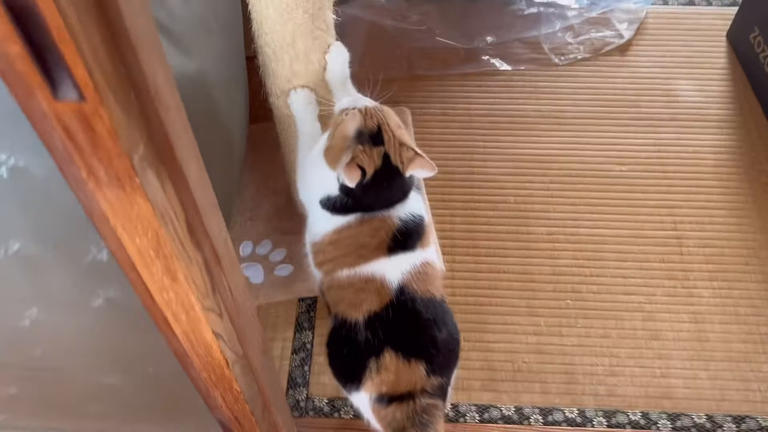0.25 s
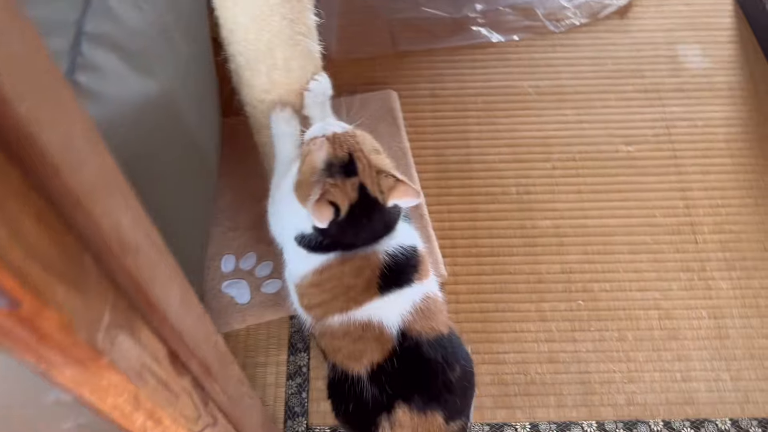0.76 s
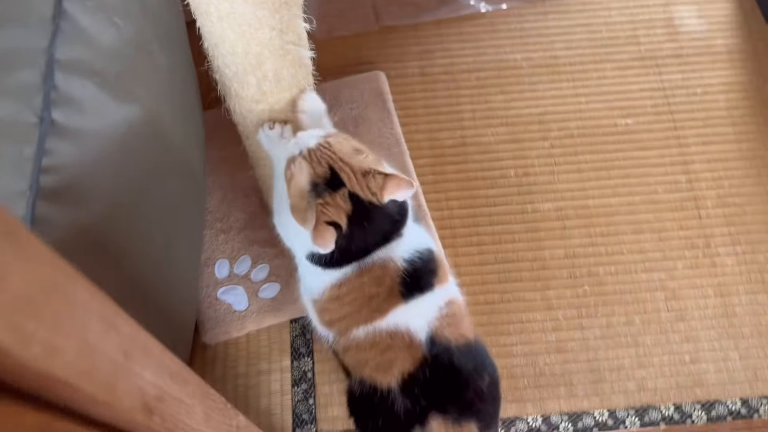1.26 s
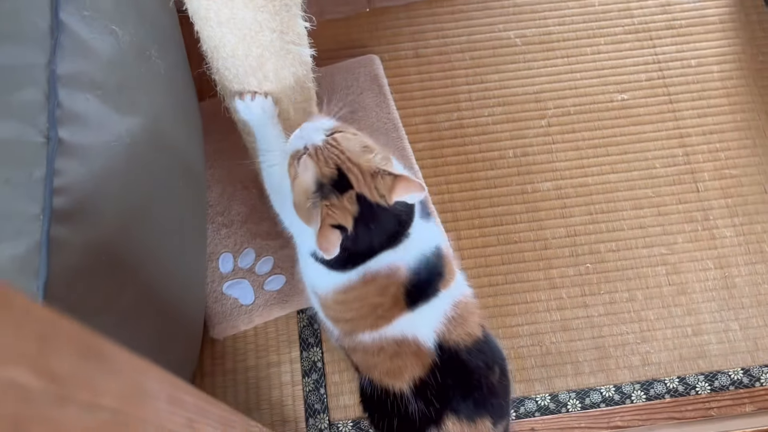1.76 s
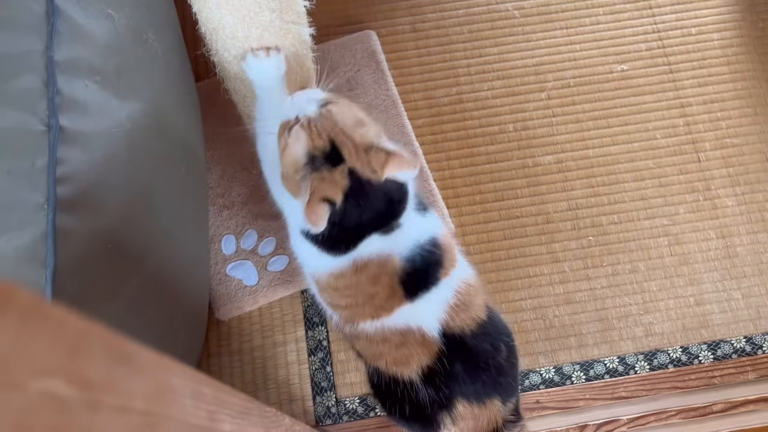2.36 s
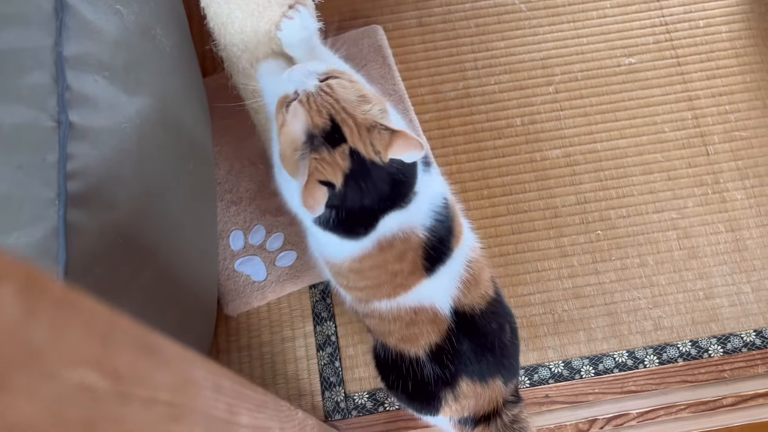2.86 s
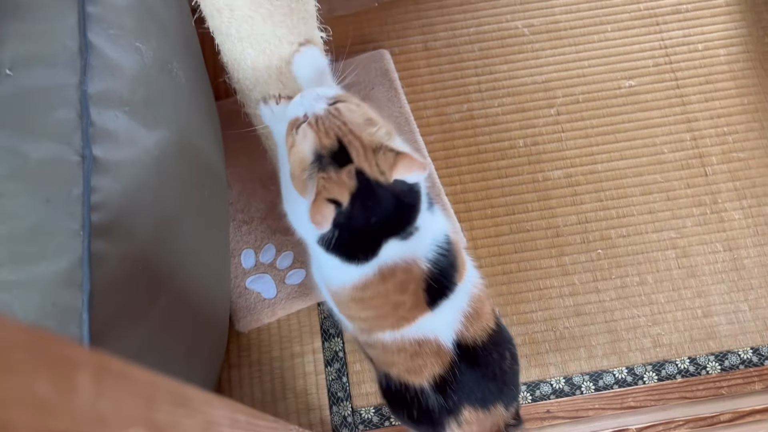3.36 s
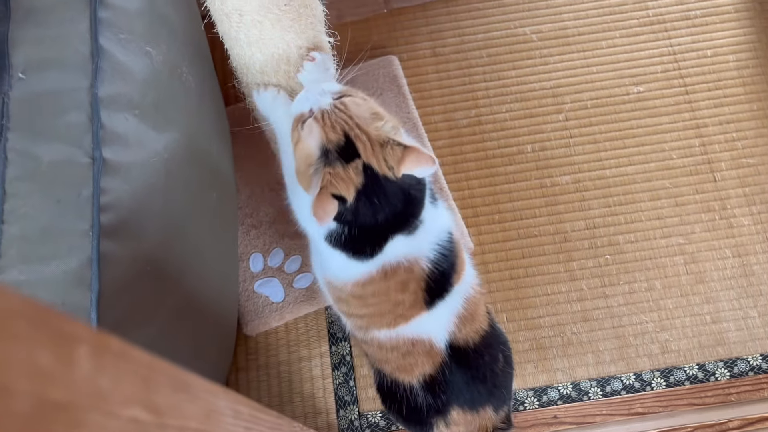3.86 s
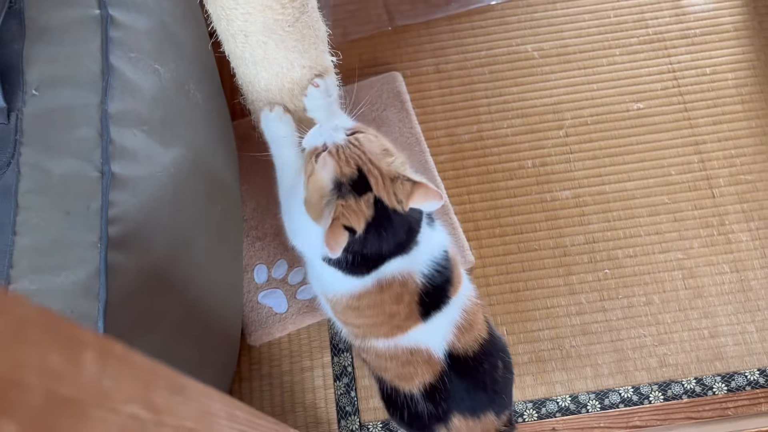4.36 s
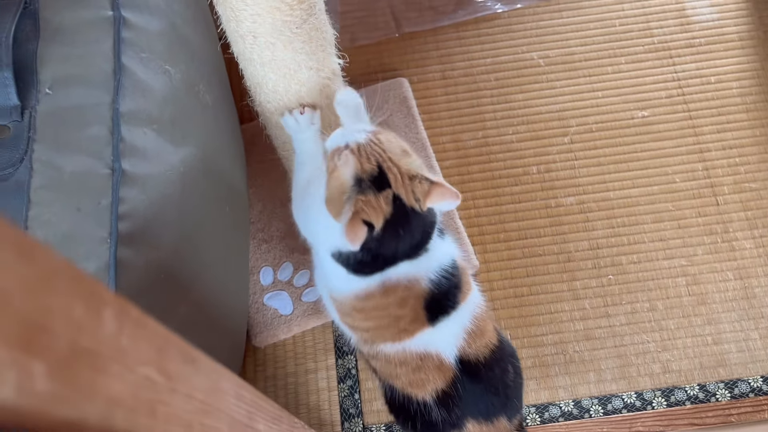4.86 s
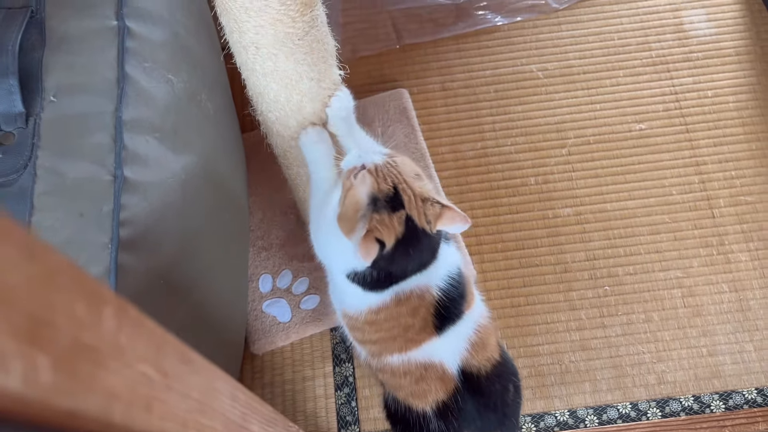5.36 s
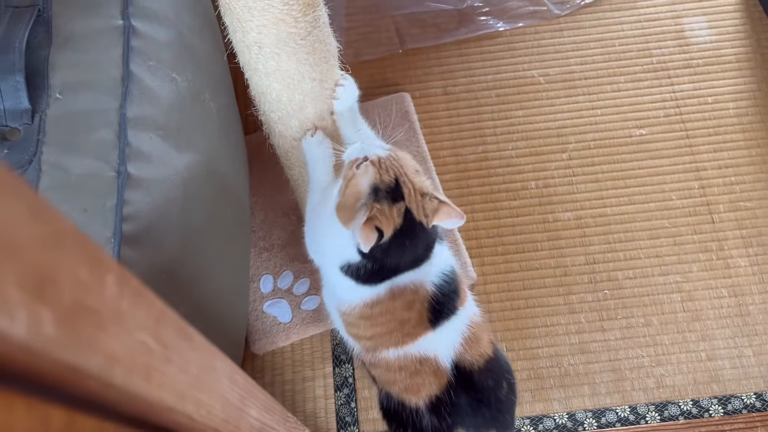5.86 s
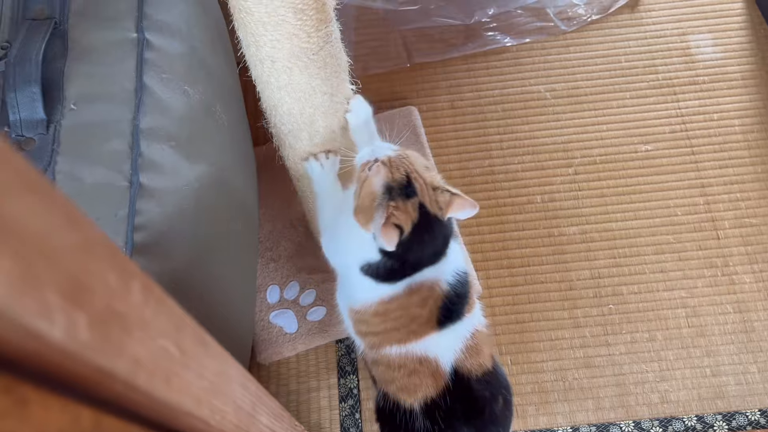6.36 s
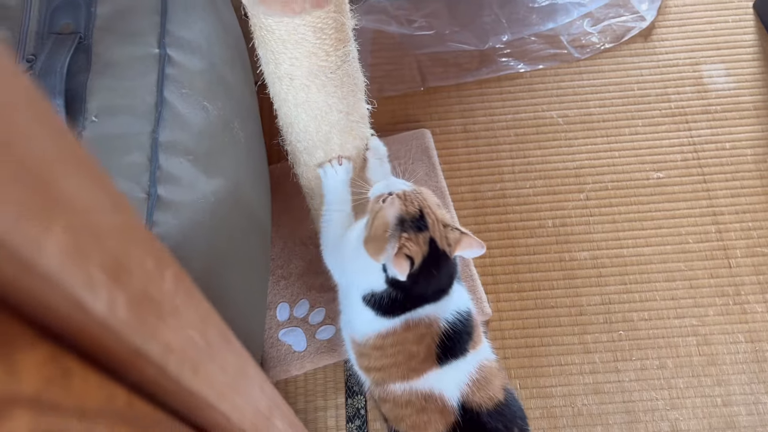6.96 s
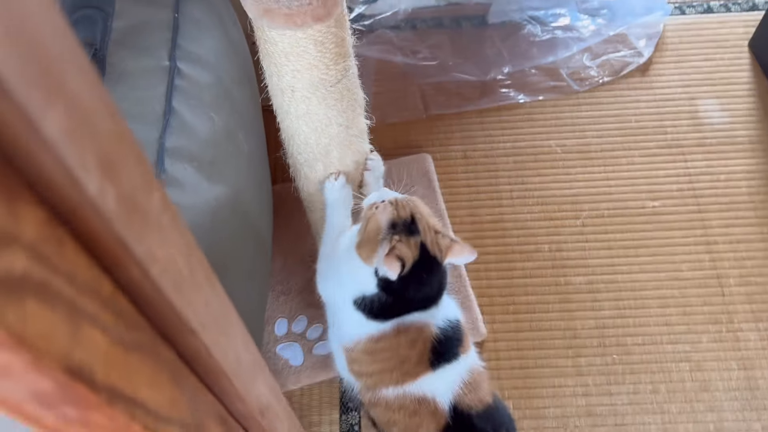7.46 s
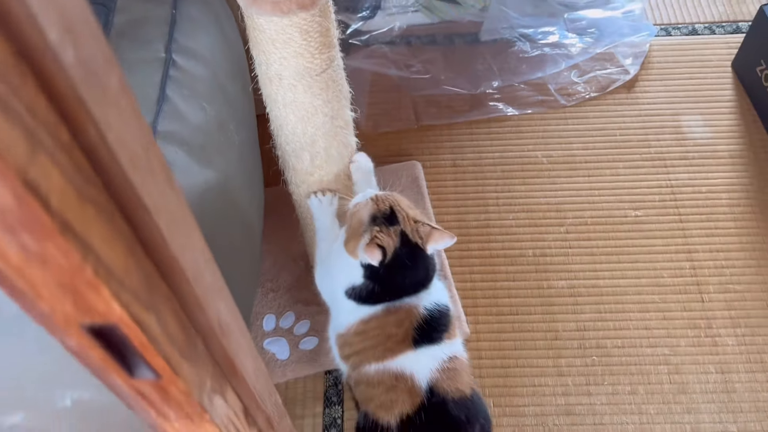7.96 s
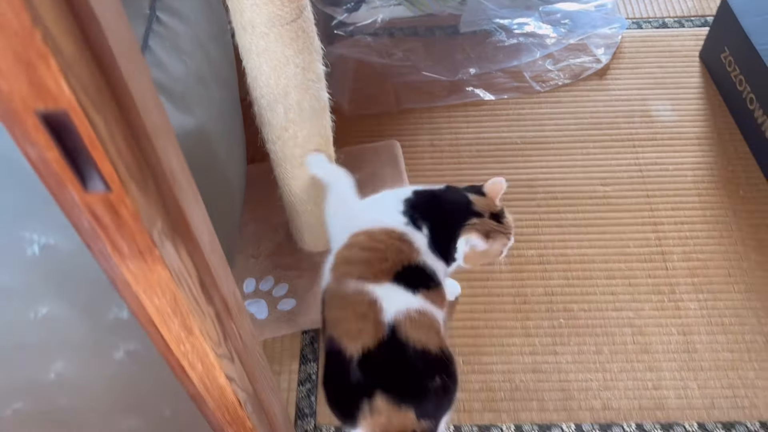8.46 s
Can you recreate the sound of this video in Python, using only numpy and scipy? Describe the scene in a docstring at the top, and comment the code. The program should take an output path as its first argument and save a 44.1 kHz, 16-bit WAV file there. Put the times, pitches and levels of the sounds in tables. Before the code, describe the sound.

Sharp claw snaps on sisal-like rope, dry and hollow, come unevenly with brief rips, tiny squawky woody chirps and soft paw rubs. The strongest flurry comes late, with dull low thumps of the base board and a small creak, then sparser snaps and a last gentle weight shift. Heard close on a hand-held device in a small room with short echoes, light hiss and wavering low rumble.

```python
"""Cat claws tear at a rope-wrapped scratching post: they catch, rip through fibres and snap free.
Each release is a sharp click with a trail of tiny slips, and it rings the modes of the hollow post.
Paws brush and slide on the rope as random small slips; the base board thumps and creaks below.
A small room answers with random, fading echoes, over faint hiss and a wavering low rumble.
Two microphone ports on a hand-held phone each hear the post with their own level and delay."""
import sys
import numpy as np
from scipy import signal
from scipy.fft import rfft, irfft, next_fast_len
from scipy.io import wavfile
from scipy.ndimage import uniform_filter1d

SR = 44100
rng = np.random.default_rng(int(sys.argv[2]) if len(sys.argv) > 2 else 0)


def put_to_file(sound):
    """Save the sound as 16-bit audio at rate SR, in the file named by the first command-line argument."""
    columns = np.atleast_2d(sound).T  # one column per channel
    safe = np.clip(columns, -1, 1)
    whole_steps = np.round(safe * 32767)
    wavfile.write(sys.argv[1], SR, whole_steps.astype(np.int16))


N = 383209  # length of the scene in samples

# Event levels are those at the source, before spectrum filters, ports, room and microphone.
# a claw snaps free: start_s, tube_ring_db, ring_centre_hz, fibre_crack_db, tip_tick_db, post_knock_db
SNAPS = [(0.0459, -49, 1550, -51.5, -61, -52.5), (0.4236, -46.5, 1470, -46.5, -48.5, -51),
         (0.749, -49.5, 1420, -54, -48.5, -54), (0.8945, -51, 1180, -48, -40, -57.5),
         (1.3323, -49, 1100, -62.5, -69, -51.5), (1.724, -41, 1460, -43.5, -39.5, -48.5),
         (1.8514, -42.5, 1530, -47, -48, -49), (2.272, -52.5, 980, -60, -64, -53),
         (2.7369, -52.5, 1010, -57.5, -52.5, -49.5), (2.9775, -47, 1230, -47, -38.5, -53.5),
         (3.158, -43.5, 890, -45, -38, -47.5), (3.9913, -47.5, 800, -54, -46.5, -46.5),
         (4.3671, -48, 1190, -51, -64, -53.5), (4.7084, -41, 874, -40.5, -37.5, -45.5),
         (5.1433, -49.5, 1090, -47, -44.5, -50), (5.4327, -49.5, 1160, -62, -35.5, -50),
         (5.9786, -51.5, 1580, -46.5, -53, -51), (6.413, -49, 1250, -47, -46, -45),
         (6.426, -45, 1300, -38, -42, -42.5), (7.076, -47, 1180, -43, -55, -46),
         (7.5714, -49.5, 1570, -45, -46, -49.5), (7.983, -49.5, 1380, -55, -45, -49)]
# a claw tip snags in the rope: start_s, tube_thud_db, tip_scratch_db
CATCHES = [(0.163, -61, -67.5), (0.686, -60.5, -66.5), (0.824, -77, -63), (2.001, -66, -55.5),
           (2.09, -56, -67), (2.102, -62, -64), (2.636, -59.5, -67), (3.154, -43.5, -47.5),
           (3.271, -53, -53.5), (3.286, -45, -58), (3.708, -62.5, -59.5), (4.802, -68, -58.5),
           (5.787, -57, -61), (6.073, -51.5, -55.5), (6.242, -58.5, -59), (6.536, -54, -50.5),
           (6.551, -53, -55.5), (6.627, -54.5, -49), (6.636, -46, -57), (6.974, -62.5, -61.5),
           (7.051, -55, -64)]
# claws drag through the fibres; each part is set against the level: start_s, length_s, level_db, ring_centre_hz
RIPS = [(0.904, 0.087, -48, 1170), (1.333, 0.025, -52.5, 955), (1.864, 0.056, -45.5, 1210),
        (2.274, 0.048, -48, 970), (3.284, 0.045, -48, 1260), (5.876, 0.02, -52.5, 1400),
        (6.507, 0.096, -53, 1400)]
# a dragging claw makes the tube squawk, level before its wavering: start_s, length_s, level_db, pitch_hz
SQUAWKS = [(0.943, 0.015, -45, 945), (0.96, 0.017, -54, 1124), (1.901, 0.021, -48.5, 920),
           (2.271, 0.056, -47.5, 968.4), (3.292, 0.013, -46, 1290)]
# a paw brushes along the rope, level before it turns patchy: start_s, length_s, level_db
BRUSHES = [(1.265, 0.19, -71), (1.624, 0.034, -62.5), (2.617, 0.083, -70.5), (3.093, 0.042, -63.5),
           (3.86, 0.11, -71.5), (4.918, 0.11, -69), (5.687, 0.05, -65.5), (6.244, 0.15, -67.5),
           (7.264, 0.097, -70), (8.372, 0.11, -66.5)]
# a pad slides without claws, level before it turns patchy: start_s, length_s, level_db
SLIDES = [(0.469, 0.12, -68), (2.359, 0.5, -73.5), (2.876, 0.079, -61), (7.631, 0.124, -71)]
# the cat shifts its weight onto the base board, pitch before it varies: start_s, level_db, pitch_hz
THUMPS = [(0.19, -59.5, 60), (0.523, -52, 50), (0.921, -48.5, 92), (3.318, -54.5, 96), (5.408, -49, 92.8),
          (6.097, -55.5, 93), (6.438, -41, 62.4), (6.517, -34, 97), (6.567, -41.5, 92), (6.638, -46, 89.2),
          (7.16, -49.5, 60.3), (7.329, -52, 88), (8.564, -51, 88.2)]
# the loaded base creaks: start_s, level_db, pitch_hz
CREAKS = [(6.535, -51, 370), (6.62, -56.5, 570), (7.489, -62, 444)]

# modes of the rope-wrapped tube, before each strike varies them: pitch_hz, level_db, t60_s (time to fall 60 dB)
POST_MODES = [(476, -1.5, 0.039), (535, -1, 0.034), (881, 0.5, 0.025), (1029, -0.5, 0.017),
              (1259, -0.5, 0.021), (1609, 2, 0.022), (1910, -0.5, 0.014), (2335, -1.5, 0.011)]
# low modes of post and base: pitch_hz, level_db, t60_s
KNOCK_MODES = [(146, -2.5, 0.052), (190.3, 11, 0.035), (402.4, 1.5, 0.027)]
# lingering modes of the furniture and the room: pitch_hz, level_db, t60_s
ROOM_MODES = [(223, 0.5, 0.17), (313.2, -1.5, 0.69), (360.6, -5, 0.67)]

# spectrum shapes, overall level set elsewhere: frequency_hz, level_db
CRACK = [(350, -15.5), (1900, 1), (2600, -5.5), (3600, 0.5), (5200, -5.5), (8500, -14.5), (14000, -35)]  # a fibre cracking
TICK = [(1500, -18), (7000, -12.5), (12500, -11), (16500, -34)]  # a claw tip ticking
FIBRE = [(300, 3), (1000, 12), (3500, 5.5), (6500, -1), (13000, -3), (16000, -34.5)]  # fibres crackling
CLAW = [(2200, -7), (3500, -1), (5000, -9.5), (13000, -11), (16000, -34)]  # a claw tip scratching
FUR = [(400, -3.5), (1500, 3), (3600, 0.5), (6000, -4), (13200, -1), (16000, -34.5)]  # loose hairs of the rope
PAD = [(300, -0.5), (750, 1), (2200, -2.5), (7000, -26)]  # a pad on the rope
RATTLE = [(90, -13), (200, 1.5), (320, -7), (470, -1.5), (800, -5), (1600, -38)]  # the post in its seat
SCUFF = [(60, 11), (400, -7), (900, -27), (3000, -46)]  # the board on the mat
ROOM_COLOUR = [(50, 4), (250, 3), (3000, -2.5), (13000, -8.5)]  # the echoes
AIR = [(25, -15), (76, 2.5), (641, -11.5), (3430, -31), (8140, -50), (10200, -42), (12500, -36.5),
       (14000, -31), (16000, -47)]  # still air
RUMBLE = [(20, -19.5), (45, 2), (95, 4), (130, -11.5), (330, -13), (2000, -62.5)]  # low rumble
# response of the microphone: frequency_hz, gain_db
MICROPHONE = [(20, -27), (40, -0.5), (7500, 1), (9000, 0), (10000, -19.5), (10700, -2.5), (11800, 4.5)]
# how long the echoes last: frequency_hz, t60_s
ROOM_T60 = [(60, 0.32), (420, 0.32), (1100, 0.26)]
# level difference at the two ports: frequency_hz, left_minus_right_db
PORT_BALANCE = [(500, -1.9), (1100, -4.5), (1900, -4), (3300, 9.5), (5500, 0), (8000, 0.5)]
# timing difference at the two ports: frequency_hz, left_lead_radians
PORT_PHASE = [(600, 0), (1900, 1.28), (3500, .5), (5600, 0.82), (7500, 0), (9000, -2.3), (12000, -1.1)]

AGE = np.arange(SR // 4) / SR  # seconds since an event began


def undb(db):
    """Turn decibels into a gain."""
    return 10 ** (np.asarray(db) / 20)


def along(points, hz):
    """Read a (frequency, value) table between its points, on a log-frequency axis."""
    table_hz, value = np.transpose(points)
    return np.interp(np.log(hz + 0.0011), np.log(table_hz), value)


def level(x, db, seconds):
    """Scale a sound so that its energy, spread over the given time, has this rms level."""
    return x * undb(db) / np.sqrt(np.sum(x ** 2) / (seconds * SR) + 1e-18)


def add(track, s, x):
    """Mix a sound into a track at a time in seconds."""
    i = max(int(s * SR), 0)
    track[..., i:i + x.shape[-1]] += x[..., :max(N - i, 0)]


def colour(x, points, size=8192):
    """Shape the spectrum with a filter that never sounds early and keeps the power of white noise."""
    gain = undb(along(points, np.fft.rfftfreq(size, 1 / SR)))
    # folding the cepstrum (the spectrum of the log gain) makes the filter respond at once
    cepstrum = irfft(np.log(gain))
    cepstrum[1:size // 2] *= 2
    cepstrum[size // 2 + 1:] = 0
    response = irfft(np.exp(rfft(cepstrum)))
    return signal.fftconvolve(x, response / np.linalg.norm(response))[:len(x)]


def mode(hz, t60):
    """One struck mode: a sine that dies away."""
    return np.sin(2 * np.pi * hz * AGE) * np.exp(-np.log(1000) * AGE / t60)


def walk(rate):
    """A smooth random curve with a spread of 1, fed by `rate` new random values a second."""
    k = int(SR / rate)
    steps = np.repeat(rng.standard_normal(N // k + 1), k)
    slow = uniform_filter1d(uniform_filter1d(steps, k), k)[:N]
    return slow / slow.std()


def slips(n, rate, spread_db):
    """Fibres let go at random moments, `rate` a second, as clicks of random sign and size."""
    hit = rng.random(n) < rate / SR
    sign = rng.choice([-1, 1], n)
    size = np.minimum(rng.exponential(1, n), 3.5)
    return np.where(hit, sign * undb(spread_db * size), 0.0)


def burst(decay_s, slip_db=2, travel_s=0.001603):
    """A release: a click spread out by the tube, where treble travels faster, then a trail of tiny slips."""
    hz = np.fft.rfftfreq(len(AGE), 1 / SR)
    # travel_s is the delay at 1000 Hz
    spread = np.exp(-4j * np.pi * travel_s * np.sqrt(1000 * hz))
    click = irfft(spread, len(AGE)) * np.exp(-20 * AGE)
    trail = rng.standard_normal(len(AGE)) * np.exp(-AGE / decay_s)
    return click + level(trail, slip_db, 1 / SR)


def stroke(seconds, rise_s, fall_s):
    """Pressure over one movement: it rises, holds and then fades."""
    t = np.arange(int((seconds + 4 * fall_s) * SR)) / SR
    return np.minimum(t / rise_s, 1) * np.exp(-np.maximum(t - seconds, 0) / fall_s)


def post(centre_hz, focus_db=6, scatter_db=1.0, detune=0.043, linger_db=-20, linger=3.5):
    """Ring of the tube: the place of the claw favours modes near one pitch, and a little rings on."""
    chance = rng.standard_normal((len(POST_MODES), 2))
    out = 0
    for k, ((hz, db, t60), (a, b)) in enumerate(zip(POST_MODES, chance)):
        octaves_away = abs(np.log2(hz / centre_hz))
        gain = (-1) ** k * undb(db - focus_db * octaves_away + scatter_db * a)
        fade = np.exp(-np.log(1000) * AGE / t60)
        fade = fade + undb(linger_db) * np.exp(-np.log(1000) * AGE / (linger * t60))
        out = out + gain * fade * np.sin(2 * np.pi * hz * (1 + detune * b) * AGE)
    return out


def thump(hz, swell_s):
    """A soft push on the floor: a few low cycles that are strongest after swell_s."""
    phase = 2 * np.pi * np.cumsum(hz * np.ones(len(AGE))) / SR
    return np.sin(phase) * (AGE / swell_s) ** 2 * np.exp(-2 * AGE / swell_s)


def snaps(rock_db=3.5, rock_hz=54, rock_delay_s=0.02294, strain_db=-19, scrape_db=-14):
    """A claw jumps off the rope: the tip ticks, the fibre cracks, the tube rings, and the base rocks back."""
    body, crack, tick, fibres = np.zeros((4, N))
    for s, ring_db, hz, crack_db, tick_db, knock_db in SNAPS:
        low = sum(undb(db) * mode(f * (1 + 0.093 * rng.standard_normal()), t60) for f, db, t60 in KNOCK_MODES)
        knock = low * (1 - np.exp(-AGE / 0.039))
        tube = post(hz)
        add(body, s, level(tube, ring_db, 0.033))
        add(body, s + 0.0015, level(knock, knock_db, 0.011))
        add(body, s + rock_delay_s, level(thump(rock_hz, swell_s=0.0041), knock_db + rock_db, 0.021))
        add(crack, s, level(burst(decay_s=0.0025), crack_db, 0.021))
        add(tick, s, level(burst(decay_s=0.00094), tick_db, 0.0031))
        # fibres strain more and more before the release (a fade played backwards)
        strain = slips(len(AGE), rate=3700, spread_db=13.5) * np.exp(-AGE / 0.0041)
        strain = strain[:SR // 25][::-1]
        # and spring back one by one after it
        scrape = slips(len(AGE), rate=520, spread_db=7.0) * np.exp(-AGE / 0.0095)
        for start, force, db in (s - len(strain) / SR, strain, strain_db), (s + 0.0051, scrape, scrape_db):
            add(fibres, start, level(force, crack_db + db, 0.023))
            add(body, start, level(signal.fftconvolve(force, tube), ring_db + db, 0.026))
    return np.array([body, colour(crack, CRACK) + colour(tick, TICK) + colour(fibres, FIBRE)])


def catches(rise_s=0.0012, fall_s=0.0034):
    """A claw tip hooks in: snagged fibres take the load and give way, nudging the tube and scratching the tip."""
    body, tip = np.zeros((2, N))
    give = (1 - np.exp(-AGE / rise_s)) * np.exp(-AGE / fall_s)
    for s, thud_db, scratch_db in CATCHES:
        force = give * slips(len(AGE), rate=5000, spread_db=2.5)
        nudge = signal.fftconvolve(force, post(centre_hz=1300))
        add(body, s, level(nudge, thud_db, 0.012))
        add(tip, s, level(force, scratch_db, 0.014))
    return np.array([body, colour(tip, CLAW)])


def rips(ring_db=-6.5, crackle_db=-3, knock_db=-6.0, snag_db=4):
    """Claws stick and slip in the rope: slips crackle and shake the tube; thick strands snag harder."""
    body, crackle = np.zeros((2, N))
    low = sum(undb(db) * mode(hz, t60) for hz, db, t60 in KNOCK_MODES)
    for start, seconds, db, hz in RIPS:
        press = stroke(seconds, rise_s=0.041 * seconds, fall_s=0.011)
        strands = abs(slips(len(press), rate=170, spread_db=-8.5))
        snags = signal.fftconvolve(strands, np.exp(-AGE / 0.0022))[:len(press)]
        press = press * (1 + undb(snag_db) * snags)
        force = press * slips(len(press), rate=450, spread_db=3)
        fray = press * slips(len(press), rate=1300, spread_db=5)
        ring = signal.fftconvolve(force, post(hz, focus_db=9.5))
        add(body, start, level(ring, db + ring_db, seconds))
        add(body, start, level(signal.fftconvolve(force, low), db + knock_db, seconds))
        add(crackle, start, level(force + .5 * fray, db + crackle_db, seconds))
    return np.array([body, colour(crackle, FIBRE)])


def squawks(jitter=0.05, rough_db=3.0, overtone_db=-17):
    """Stick-slip locks onto the tube for a moment: a short woody tone, unsteady in pitch and strength."""
    out = np.zeros(N)
    waver, grip = walk(rate=400), np.tanh(walk(rate=540))
    for start, seconds, db, hz in SQUAWKS:
        press = stroke(seconds, rise_s=0.0015, fall_s=0.0022)
        now = int(start * SR) + np.arange(len(press))
        phase = 2 * np.pi * np.cumsum(hz * (1 + jitter * waver[now])) / SR
        tone = np.sin(phase) + undb(overtone_db) * np.sin(2 * phase)
        add(out, start, level(press * undb(rough_db * grip[now]) * tone, db, seconds))
    return out


def clawing():
    """The clawing in one direction, as two voices: the ring of the tube and the crackle of the fibres."""
    tube, fibres = snaps() + catches() + rips()
    return tube + squawks(), fibres


def rattles(rattle_db=-5, decay_s=0.016, rise_s=0.0028):
    """Each snap shakes the post in its seat: a short, dull chatter of wood on wood."""
    out = np.zeros(N)
    shake = (1 - np.exp(-AGE / rise_s)) * np.exp(-AGE / decay_s)
    for s, *_, knock_db in SNAPS:
        chatter = shake * slips(len(AGE), rate=700, spread_db=1.5)
        add(out, s, level(chatter, knock_db + rattle_db, 0.0082))
    return colour(out, RATTLE)


def brushes(patchy_db=2, pull_s=0.032, pull_db=-29):
    """A paw swells into a move along the rope, bending many loose hairs."""
    out = np.zeros(N)
    # before each snap the paw drags lightly down the rope, pull_db against the ring
    pulls = [(s - pull_s, pull_s, ring_db + pull_db) for s, ring_db, *_ in SNAPS if s > pull_s]
    for start, seconds, db in BRUSHES + pulls:
        press = stroke(seconds, rise_s=seconds / 2, fall_s=0.014)
        hairs = press * slips(len(press), rate=5800, spread_db=6.0)
        add(out, start, level(hairs, db, seconds))
    return colour(out * undb(patchy_db * walk(rate=43)), FUR)


def slides(patchy_db=2):
    """A sliding pad rubs the rope softly: sparser, more even slips with little treble."""
    out = np.zeros(N)
    for start, seconds, db in SLIDES:
        press = stroke(seconds, rise_s=0.27 * seconds, fall_s=0.008)
        rub = press * slips(len(press), rate=1400, spread_db=2.0)
        add(out, start, level(rub, db, seconds))
    return colour(out * undb(patchy_db * walk(rate=29)), PAD)


def loose_fibres(hair_db=-78.5, patchy_db=5, spring_db=-16, spring_s=0.011):
    """Stray hairs of the rope rustle faintly, and spring back after each snap."""
    patches = undb(patchy_db * np.tanh(walk(rate=8.3)))
    hairs = level(slips(N, rate=3600, spread_db=5.5) * patches, hair_db, N / SR)
    t = np.arange(N) / SR
    # the paws hang still between the last snap and the last brush: half the rustle
    resting = (t > SNAPS[-1][0]) & (t < BRUSHES[-1][0])
    hairs = hairs * (1 - resting / 2)
    for s, _, _, crack_db, *_ in SNAPS:
        spring = slips(len(AGE), rate=1800, spread_db=3.0) * np.exp(-AGE / spring_s)
        add(hairs, s, level(spring, crack_db + spring_db, spring_s))
    return colour(hairs, FUR)


def thumps(scuff_db=-11, sway_db=-71, sway_hz=62, totter=0.22):
    """The base board rocks at an uneven pace under shifting weight, scuffs on the mat and sways gently."""
    out, scuff = np.zeros((2, N))
    # each thump takes its own stretch of the random pace; totter is the largest share it varies by
    pace_curve = 1 + totter * np.tanh(walk(rate=130))
    paces = pace_curve[:len(THUMPS) * len(AGE)].reshape(-1, len(AGE))
    for (s, db, hz), pace in zip(THUMPS, paces):
        push = level(thump(hz * pace, swell_s=0.017), db, 0.039)
        add(out, s, push)
        add(scuff, s, abs(push) * rng.standard_normal(len(push)))
    small_shifts = slips(N, rate=2.7, spread_db=0.5)
    sway = signal.fftconvolve(small_shifts, thump(sway_hz, swell_s=0.018))[:N]
    return out + undb(scuff_db) * colour(scuff, SCUFF) + level(sway, sway_db, N / SR)


def creaks():
    """Small slips in the loaded base excite a low, short ring: soft creaks."""
    out = np.zeros(N)
    press = stroke(0.027, rise_s=0.0043, fall_s=0.0087)
    for s, db, hz in CREAKS:
        ring = mode(hz, t60=0.018)
        soft_ring = signal.fftconvolve(ring, ring)  # rung through twice, so it swells in
        force = press * slips(len(press), rate=1300, spread_db=-1.0)
        add(out, s, level(signal.fftconvolve(force, soft_ring), db, 0.03))
    return out


def ports(x):
    """The phone's body gives each port its own level and delay."""
    n = next_fast_len(N, True)
    hz = np.fft.rfftfreq(n, 1 / SR)
    # each port takes half the difference, in opposite directions
    half = undb(along(PORT_BALANCE, hz) / 2) * np.exp(.5j * along(PORT_PHASE, hz))
    return irfft(rfft(x, n) * np.array([half, 1 / half]), n)[:, :N]


def echoes(wet_db=-5, early_db=-8, modes_db=-22, build_s=0.00033, wide_hz=300):
    """Room response at one place: near reflections, a tail alike at both ports in the bass, lingering modes."""
    n = SR // 2
    t, hz = np.arange(n) / SR, np.fft.rfftfreq(n, 1 / SR)
    mid, side = rfft(rng.standard_normal((2, n)))
    apart = hz / (hz + wide_hz)
    noise = np.array([mid + apart * side, mid - apart * side]) * undb(along(ROOM_COLOUR, hz))
    # each octave of the noise dies away at its own speed
    octave = np.round(np.log2(np.maximum(hz, 32)))
    tail = 0
    for k in np.unique(octave):
        fade = np.exp(-np.log(1000) * t / along(ROOM_T60, 2 ** k))
        tail = tail + irfft(noise * (octave == k)) * fade
    tail = level(tail * (1 - np.exp(-(t / build_s) ** 2)), wet_db, 2 / SR)
    # the mat and the door frame are close and answer each port differently
    early = irfft(rfft(rng.standard_normal((2, n))) * apart) * t * np.exp(-t / 0.0018)
    lingering = sum(rng.choice([-1, 1]) * undb(db) * mode(f, t60) for f, db, t60 in ROOM_MODES)
    tail[:, :len(AGE)] += level(lingering, modes_db, 1 / SR)
    return tail + level(early, early_db, 2 / SR)


def room(x):
    """The phone drifts in the hand, so the sound blends into a new pattern of echoes every half second."""
    hop = SR // 2
    padded, out = np.pad(x, (hop, 2 * hop)), np.zeros((2, N + 4 * hop))
    fade = np.sin(np.pi * np.arange(2 * hop) / (2 * hop))
    for i in range(0, N + hop, hop):
        piece = fade * padded[i:i + 2 * hop]
        wet = signal.fftconvolve(piece[None], echoes(), axes=1)
        out[:, i:i + wet.shape[1]] += wet
    return out[:, hop:hop + N]


def background(air_db=-81, rumble_db=-69):
    """Still air as wide, faint hiss, and a low rumble whose strength wavers."""
    mid, left, right = (colour(rng.standard_normal(N), AIR) for _ in range(3))
    air = undb(air_db) * (mid + 1.8 * np.array([left, right]))
    sway_db = 4 * np.tanh(walk(rate=9))
    rumble = colour(rng.standard_normal(N) * undb(rumble_db + sway_db), RUMBLE)
    return air + rumble


def scene(tube_room_db=-6, fibre_room_db=-3, floor_room_db=-2.5):
    """The clawing, direct and from two walls, in the quiet room; each wall gets its own random clawing detail."""
    tube, fibres = clawing()
    far_tube, far_fibres = clawing()
    rustle = rattles() + slides() + brushes() + loose_fibres()
    floor = thumps() + creaks()
    # how strongly each part reaches the walls
    tube_send, fibre_send, floor_send = undb([tube_room_db, fibre_room_db, floor_room_db])
    near_wall = tube_send * tube + fibre_send * fibres + rustle + floor_send * floor
    far_wall = tube_send * far_tube + fibre_send * far_fibres
    direct = ports(tube + fibres + rustle) + floor
    return direct + room(near_wall) + room(far_wall) + background()


def record(dry, top_hz=16500):
    """The microphone drops the deepest bass, its ducts cut a notch in the treble, and the top is cut off."""
    n = next_fast_len(N, True)
    gain = undb(along(MICROPHONE, np.fft.rfftfreq(n, 1 / SR)))
    heard = irfft(rfft(dry, n) * gain, n)[:, :N]
    return signal.sosfilt(signal.ellip(8, .2, 70, top_hz, fs=SR, output="sos"), heard)


dry = scene()
out = record(dry)
put_to_file(out)
```